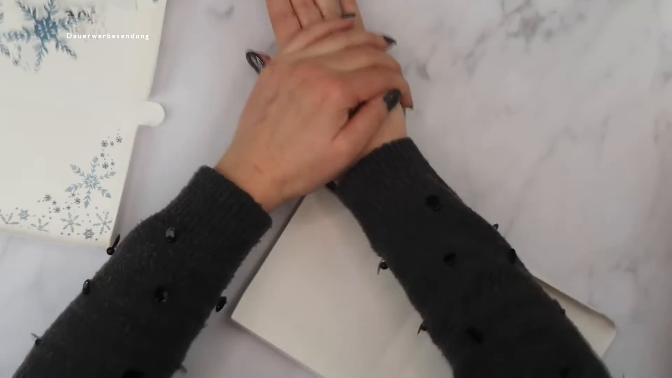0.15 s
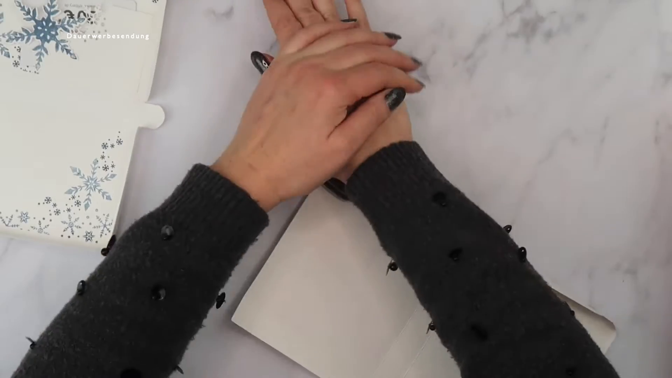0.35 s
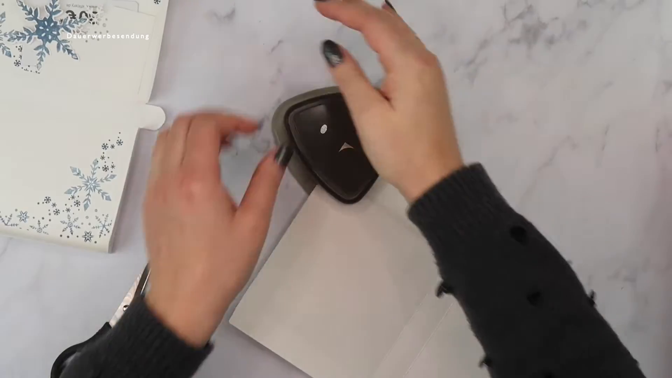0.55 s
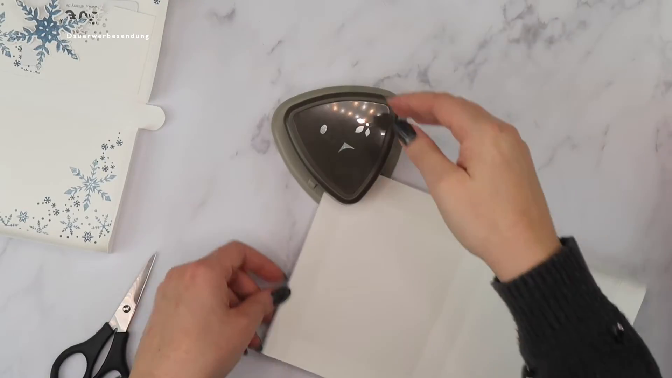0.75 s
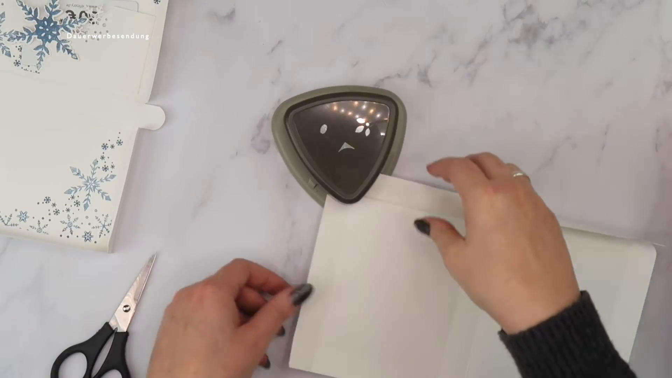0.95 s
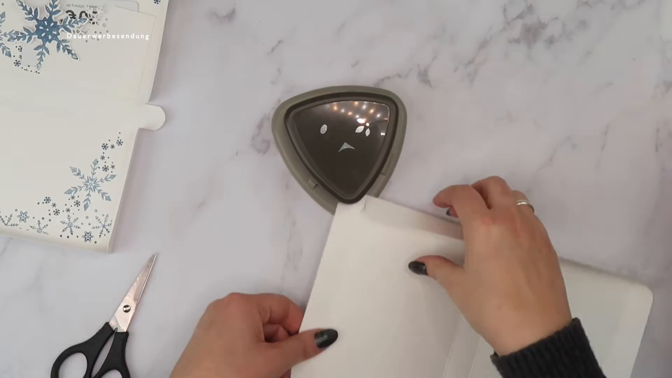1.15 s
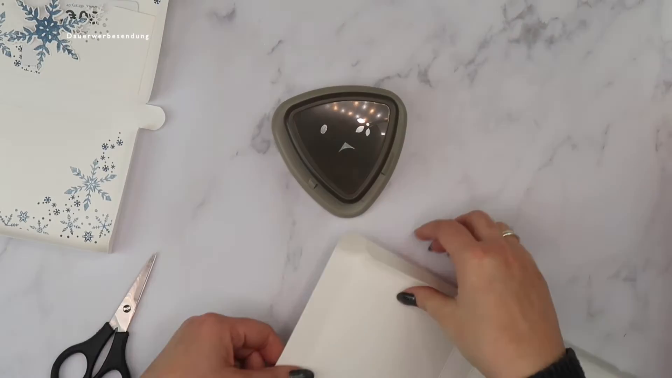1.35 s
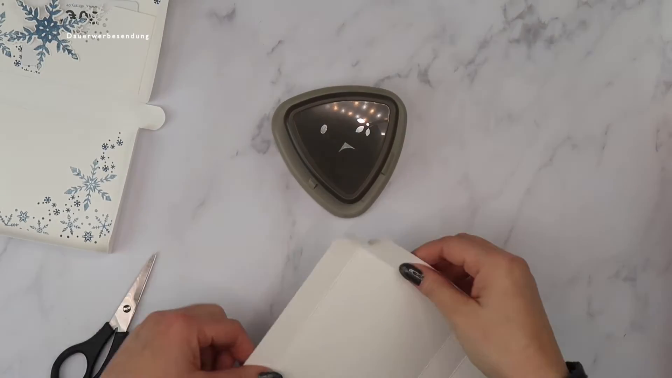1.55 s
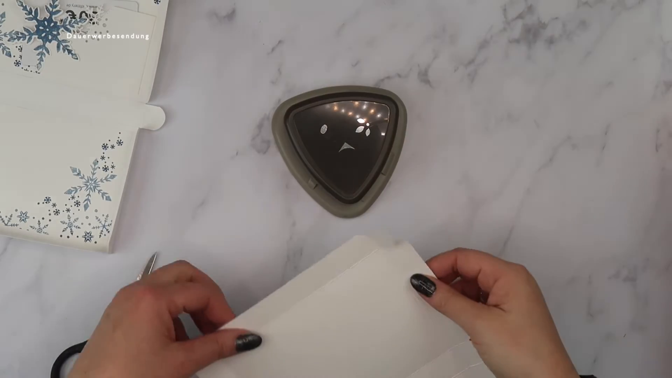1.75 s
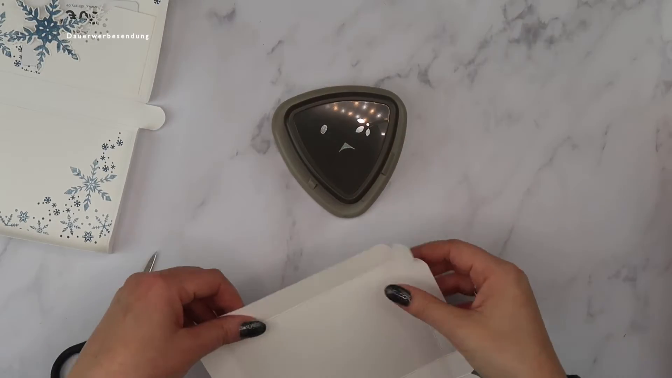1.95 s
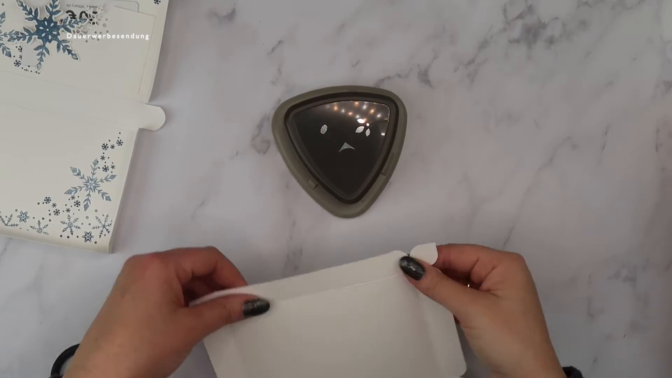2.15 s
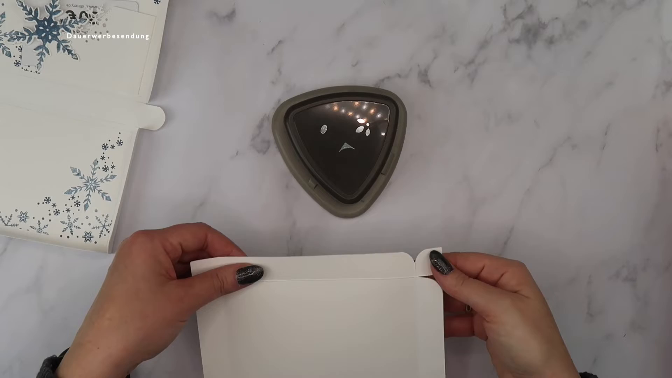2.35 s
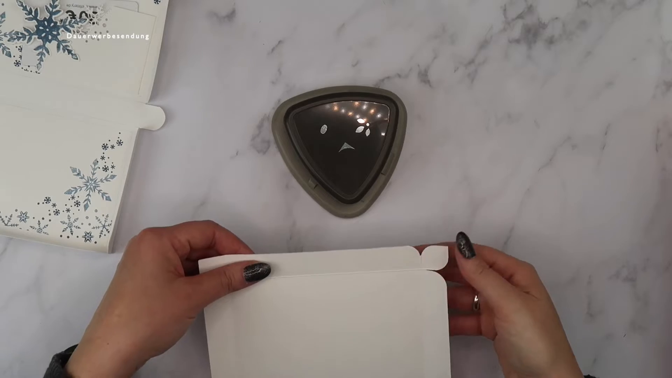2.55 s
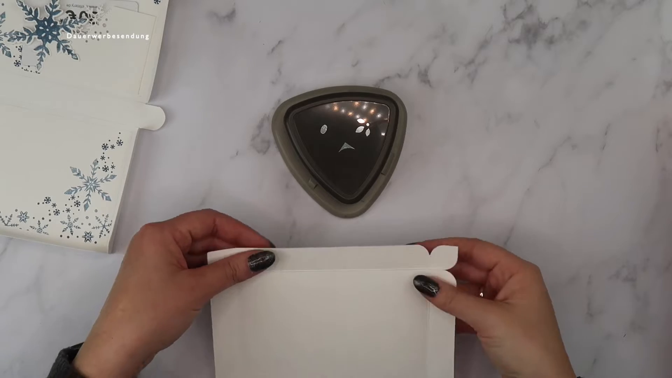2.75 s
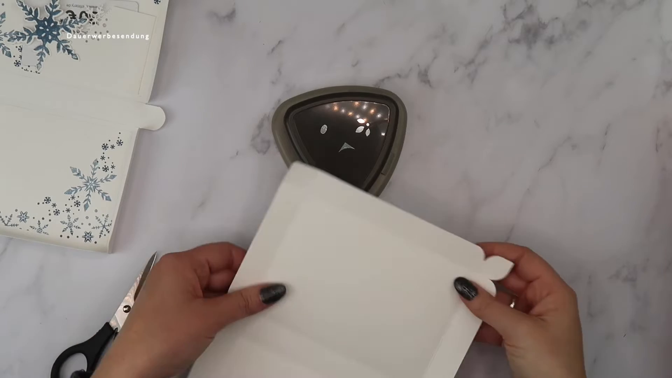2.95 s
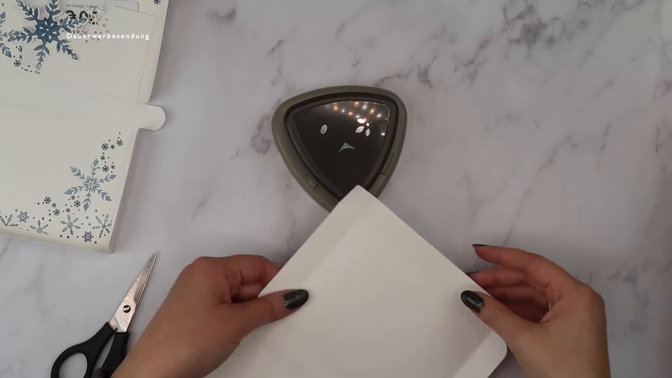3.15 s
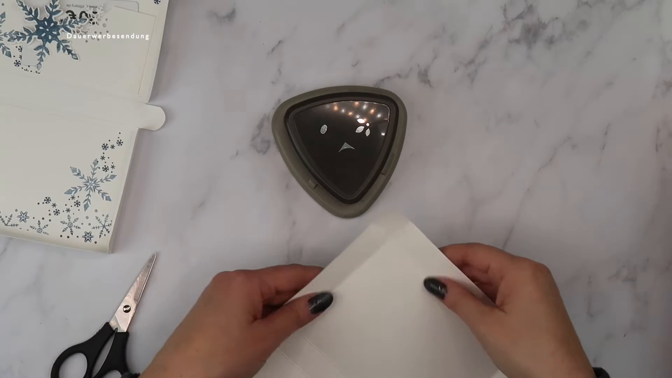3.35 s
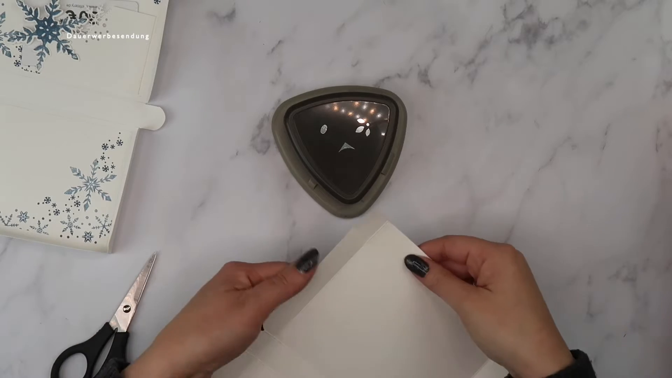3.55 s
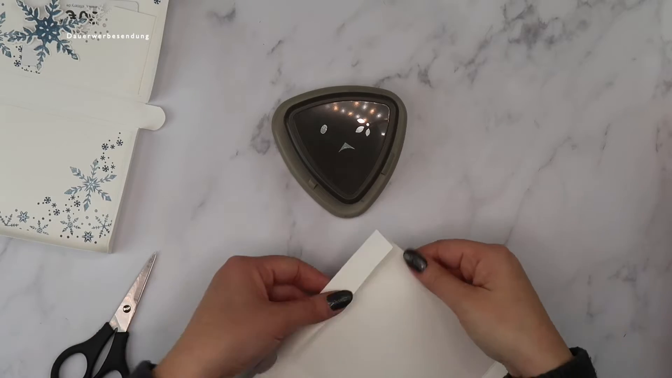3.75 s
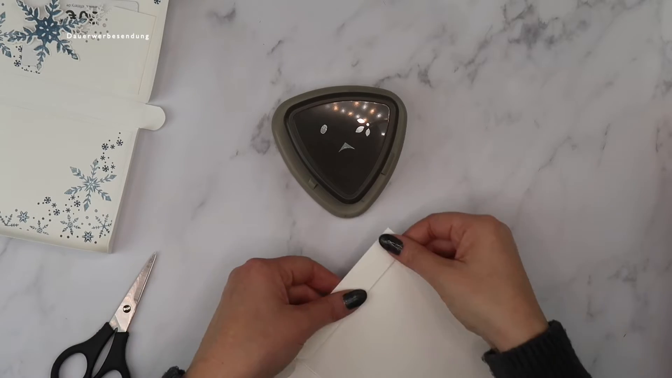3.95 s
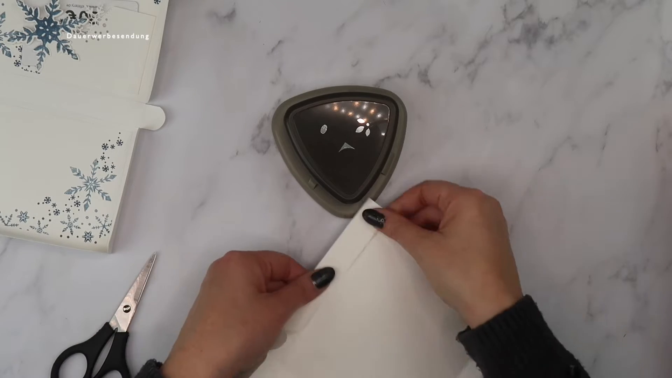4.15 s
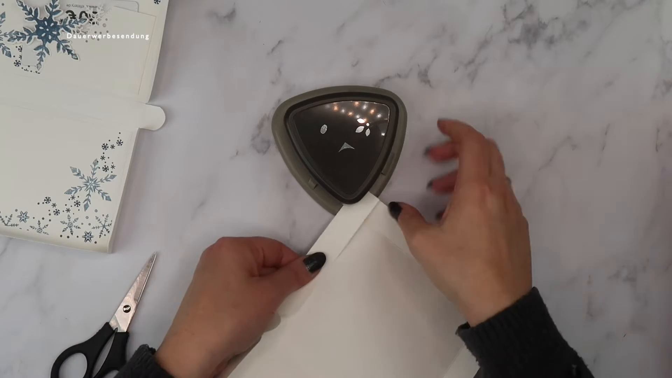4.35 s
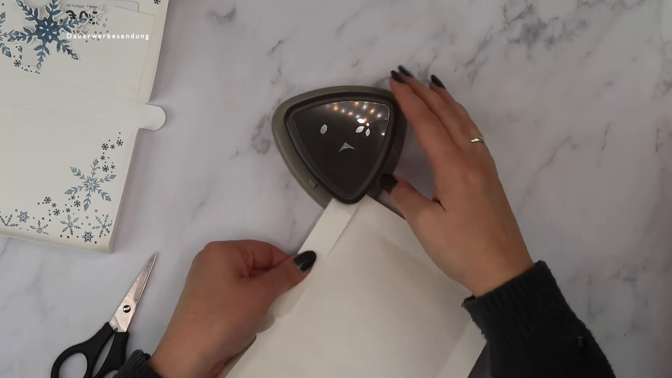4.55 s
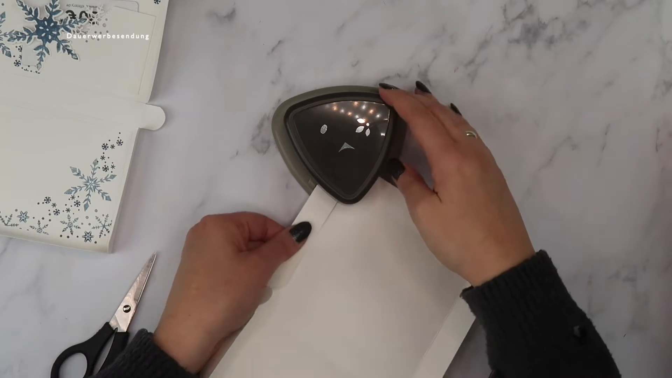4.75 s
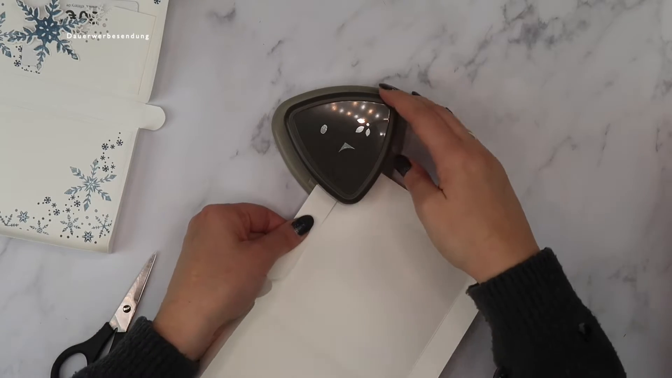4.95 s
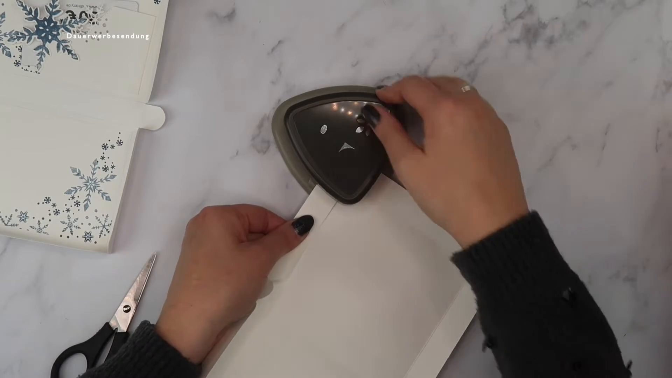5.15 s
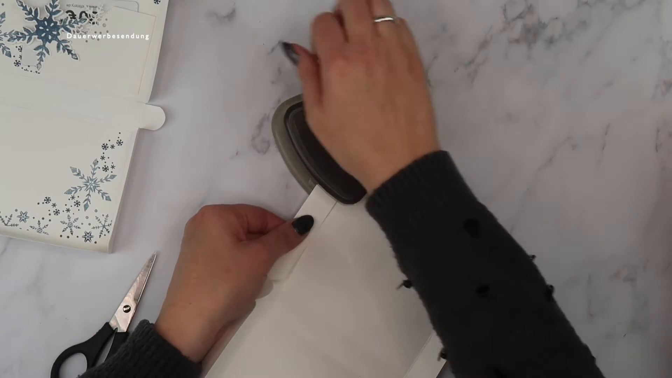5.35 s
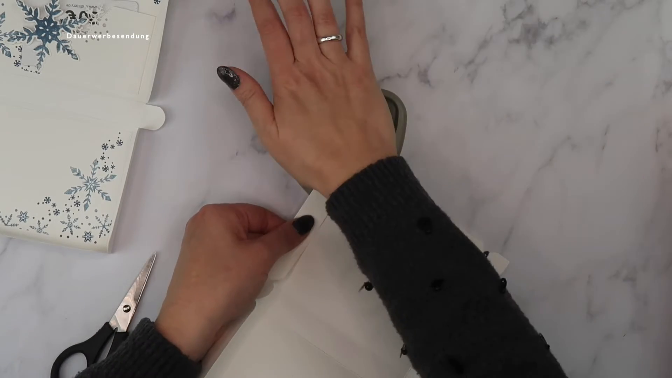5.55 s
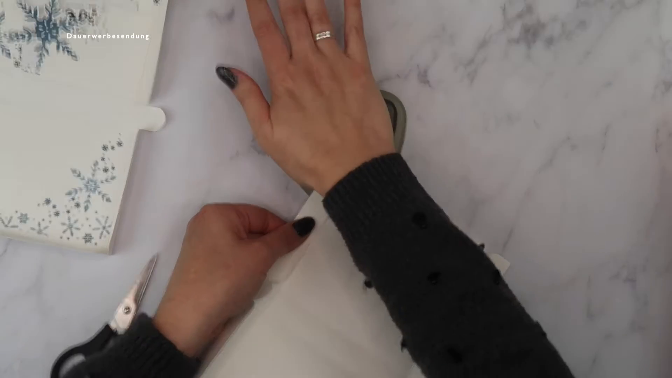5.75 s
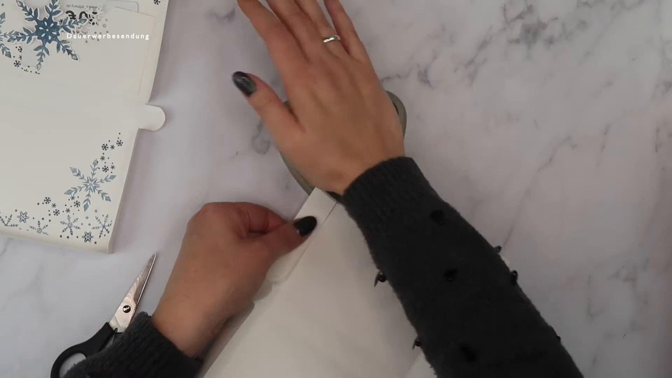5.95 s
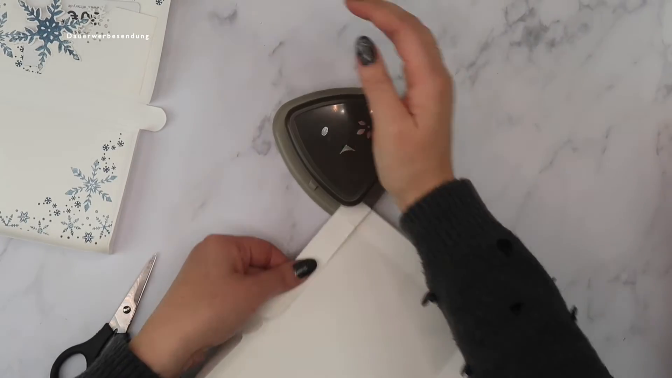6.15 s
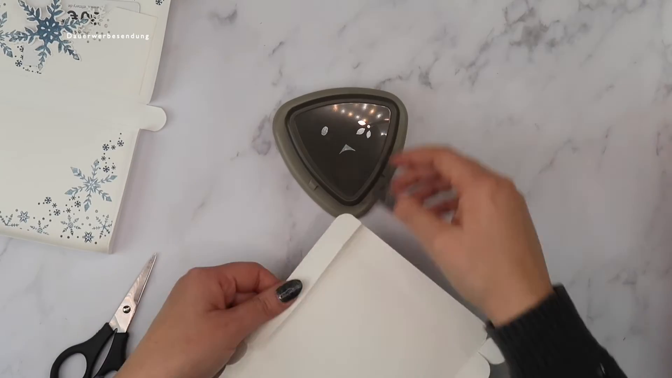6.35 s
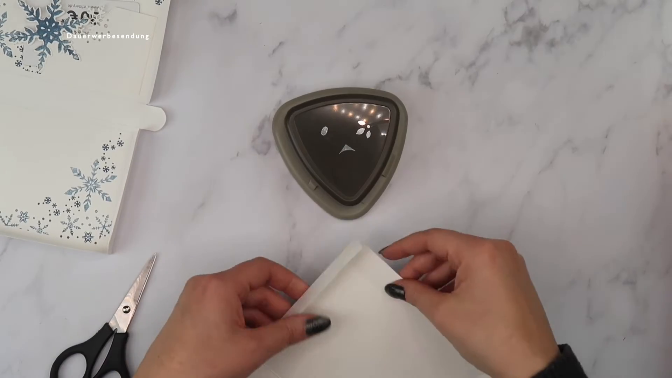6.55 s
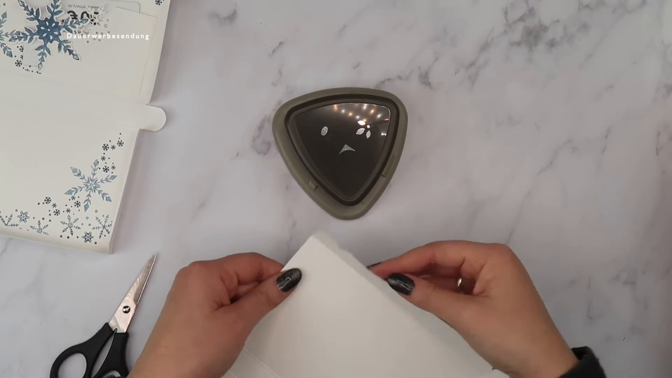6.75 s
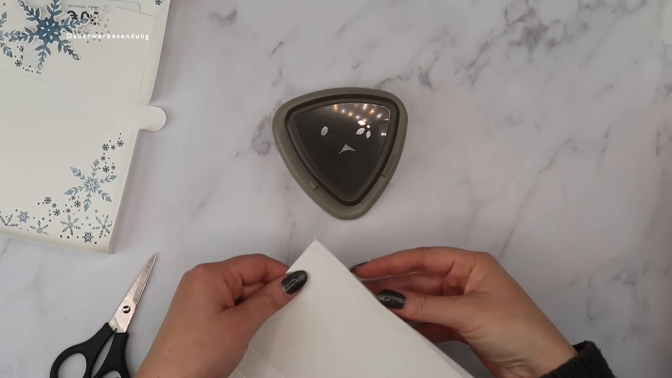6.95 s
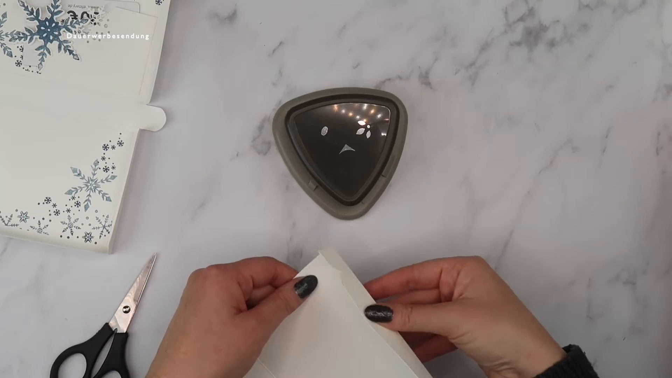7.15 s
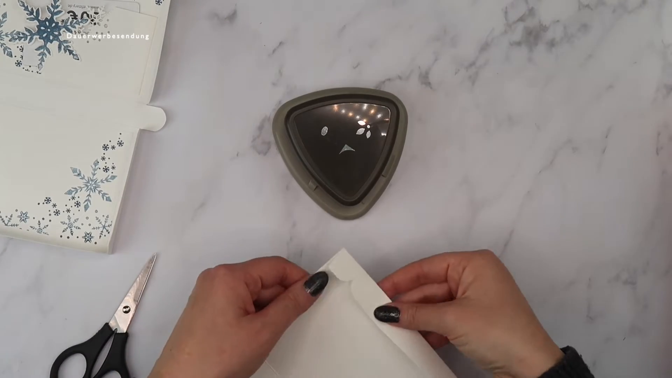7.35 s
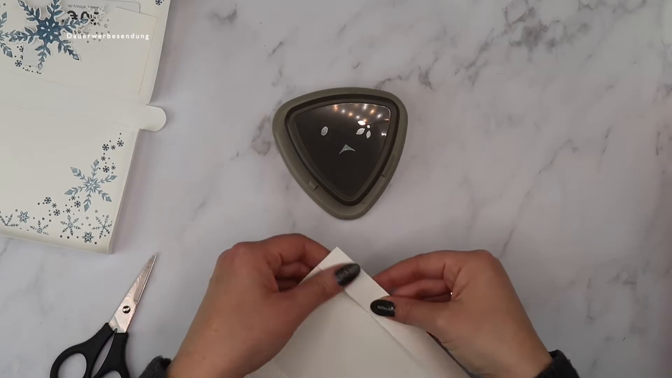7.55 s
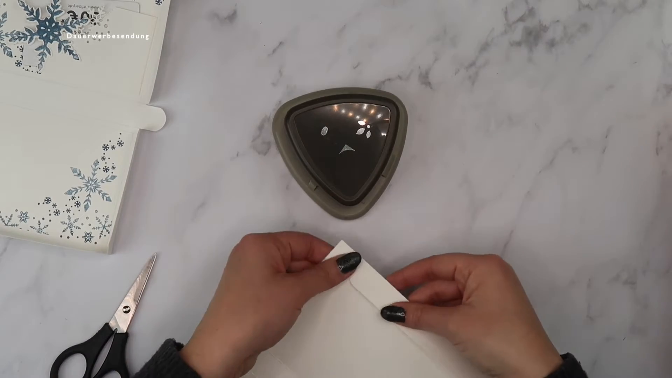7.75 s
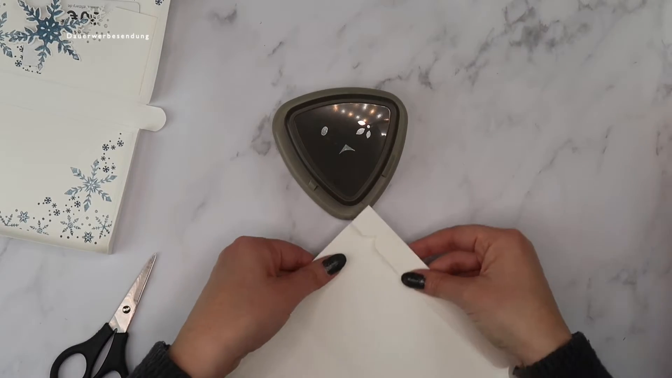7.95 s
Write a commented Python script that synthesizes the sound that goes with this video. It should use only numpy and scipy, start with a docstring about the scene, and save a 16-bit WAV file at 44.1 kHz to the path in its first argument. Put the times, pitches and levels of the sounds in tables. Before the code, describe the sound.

Two sharp, thumping punch clacks with scuffing spring-back, separated and followed by dry card rustles, taps, small squeaks and slides in a quiet room.

```python
"""A plastic corner punch on a craft table is leaned on twice: blade impacts crack, excite the shell's
modes and thump the table's modes, and a sprung lid scuffs in its guide on the way down and back.
Between and after the punches, a card is pulled out, flicked, turned and slid: filtered bursts, rings
and grains of friction. A small room adds noise, a faint hum and a decaying response; the level drops
after each punch and creeps back under automatic gain."""
import sys
import numpy as np
from scipy import signal
from scipy.fft import rfft, irfft, next_fast_len
from scipy.io import wavfile
from scipy.ndimage import uniform_filter1d, minimum_filter1d, map_coordinates

SR = 44100
rng = np.random.default_rng(int(sys.argv[2]) if len(sys.argv) > 2 else 0)


def to_wav(sig):
    """Store sig (one row per channel, or 1-D mono) as 16-bit WAV at the path in sys.argv[1].

    Samples outside -1..1 are clipped; the rate is SR.
    """
    pcm = np.clip(np.atleast_2d(sig), -1, 1) * 32767
    pcm = np.round(pcm).astype(np.int16)
    wavfile.write(sys.argv[1], SR, pcm.T)  # frames by channels


N = 356328

# modes of the table top: f/Hz, relative level/dB, t60/s before the leaning hands damp it
TABLE_MODES = [(65.3, -7, 0.33), (111.2, -10, 0.16), (130, -8, 0.11), (249.5, -1, 0.074),
               (332.3, -5.5, 0.15), (373, -29.5, 0.07), (476, -11, 0.13), (624, -30, 0.049)]


def amp(db):
    """Level to amplitude: 20 dB is a factor of ten."""
    return 10 ** (np.asarray(db) / 20)


def unit(x):
    """Normalise the mean power, giving rms 1."""
    return x / np.sqrt(np.mean(x ** 2) + 1e-20)


def along(points, hz):
    """Interpolate (f, value) points linearly over logarithmic frequency."""
    f, value = np.transpose(points)
    return np.interp(np.log(hz + 1), np.log(f + 1), value)


def wobble(rate):
    """Band-limited random modulation: a smooth curve through random knots, rate of them a second."""
    knots = rng.standard_normal(int(N * rate / SR) + 4)
    return map_coordinates(knots, [np.arange(N) * rate / SR])


def colour(x, gain):
    """Minimum-phase filtering: folding the cepstrum of a gain curve makes its filter causal."""
    n = x.shape[-1]
    m = 2 * next_fast_len(n // 2 + 2048)
    log_gain = np.log(np.maximum(gain(np.fft.rfftfreq(m, 1 / SR)), 1e-6))
    cepstrum = irfft(log_gain)
    cepstrum[1:m // 2] *= 2
    cepstrum[m // 2 + 1:] = 0
    response = np.exp(rfft(cepstrum))
    return irfft(rfft(x, m) * response, m)[..., :n]


def filtered(x, response):
    """Linear filtering: the spectrum times a complex response of frequency."""
    m = next_fast_len(N + SR // 2)
    return irfft(rfft(x, m) * response(np.fft.rfftfreq(m, 1 / SR)), m)[..., :N]


def shaped(x, spectrum):
    """Spectral shaping: x through a curve of f/Hz, level/dB, at rms 1."""
    return unit(colour(x, lambda hz: amp(along(spectrum, hz))))


def resonance(hz, centre_hz, q):
    """Gain of a damped oscillator near its resonance, about 1 at the centre."""
    return 1 / np.hypot(1, q * (hz / centre_hz - centre_hz / (hz + 1)))


def fade(t, t60):
    """Exponential decay, 60 dB in t60 seconds."""
    return np.exp(-np.log(1000) * t / t60)


def ring(modes, t):
    """Modal superposition: decaying sines, each level scattered by about 1 dB at every blow."""
    return sum(amp(db + rng.standard_normal()) * fade(t, t60) * np.sin(2 * np.pi * hz * t)
               for hz, db, t60 in modes)


def burst(t, t60, push, gain):
    """Contact excitation: dying noise led by an impulse (push, relative to the noise), then coloured."""
    noise = rng.standard_normal(len(t)) * fade(t, t60)
    noise[0] += push * np.linalg.norm(noise)
    decay_rms = np.sqrt(np.mean(fade(t, t60) ** 2))
    return unit(colour(noise, gain)) * decay_rms


def add(track, s, sound):
    """Linear superposition: mix a sound into the track at s seconds."""
    part = track[max(round(s * SR), 0):][:len(sound)]
    part += sound[:len(part)]


def swell(start, rise, fall):
    """Movement envelope: a speed ramps up, then down, and a sine of its power sets the gain."""
    speed = np.interp(np.arange(N) / SR, [start, start + rise, start + rise + fall], [0, 1, 0])
    return np.sin(np.pi / 2 * speed ** 0.97)


def background():
    """Stationary noise: partly decorrelated room air in two channels, plus slightly unsteady mains hum."""
    # room air: f/Hz, relative level/dB
    air_spectrum = [(12, -34.5), (20, -1.5), (52, 3.5), (70, -9.5), (92, -5), (175, -10.5), (252, -8),
                    (534, -12.5), (857, -17.5), (958, -17.5), (1040, -18), (1870, -20), (2540, -22.5),
                    (11100, -38.5), (15500, -56)]
    # stereo width of the air: f/Hz, side level re mid/dB
    air_width = [(60, -28), (110, -12.5), (200, -1.5), (380, -0.5), (700, 0), (1290, 0), (2380, -1),
                 (4400, 3.5), (8120, -1), (15000, 8)]
    # mains hum partials: f/Hz, relative level/dB
    hum_partials = [(48.4, -61.5), (102.3, -61.5), (150.7, -64.5), (204.6, -66), (247.6, -77.5)]
    t = np.arange(N) / SR
    air = shaped(rng.standard_normal(N), air_spectrum)
    other_air = shaped(rng.standard_normal(N), air_spectrum)
    side = colour(other_air, lambda hz: amp(along(air_width, hz)))
    hum = sum(amp(db + 0.86 * wobble(13)) * np.sin(2 * np.pi * hz * t + .5 * wobble(0.67))
              for hz, db in hum_partials)
    return amp(-54.0) * np.array([air + side, air - side]) + amp(1.0) * hum


def leaning():
    """Forced vibration: shifting weight stirs the table's modes, radiating less well at low frequency."""
    # weight shifts: start t/s, loading time/s, easing time/s, level/dB
    shifts = [(0, 0.016, 0.064, -38), (.25, 0.054, 0.14, -43.5), (.38, 0.023, 0.153, -36.5),
              (4.63, 0.063, 0.08, -52.5), (5.53, 0.057, 0.069, -48.5), (5.61, 0.039, 0.11, -42),
              (5.86, 0.067, 0.16, -41), (5.99, 0.022, 0.22, -36)]
    top = lambda hz: sum(amp(db) * resonance(hz, centre, q=14) * np.sqrt(t60) / centre
                         for centre, db, t60 in TABLE_MODES)
    radiated = lambda hz: top(hz) * resonance(hz, 100, q=0.72)
    load = sum(amp(db) * swell(start, rise, fall) for start, rise, fall, db in shifts)
    return load * unit(colour(rng.standard_normal(N), radiated))


def held():
    """Gating: a smoothed switch, 1 while the fingers hold the card and 0 otherwise."""
    # spells of holding: from t/s, to t/s
    spells = (1.0, 5.5), (6.25, 9.9)
    t = np.arange(N) / SR
    return uniform_filter1d(sum(1.0 * ((t > start) & (t < end)) for start, end in spells), size=2000)


def friction(rate, spread_db, smooth):
    """Stick-slip: paper fibres catch and let go, as impulses of uneven size over a smooth rush."""
    struck = rng.random(N) < rate / SR
    size = amp(spread_db * np.minimum(rng.exponential(size=N), 4))
    catches = struck * rng.choice([-1, 1], N) * size
    return unit(catches) + smooth * rng.standard_normal(N)


def sliding():
    """Sliding friction: speed governs a low rustle of catches and a high hiss against the skin."""
    # single pushes or turns: start t/s, speeding up/s, slowing down/s, relative rustle and hiss level/dB
    strokes = [(.49, 0.025, 0.033, -46, -52.5), (.715, 0.0247, 0.11, -47.5, -51),
               (1.05, 0.035, 0.44, -47, -56), (1.421, 0.055, 0.26, -53.5, -61.5),
               (1.9, 0.16, 0.094, -51.5, -60.5), (2.17, 0.022, .28, -56.5, -62),
               (2.75, 0.13, 0.15, -60.5, -61.5), (3.289, 0.1, 0.11, -44.5, -58),
               (3.44, 0.056, 0.14, -55.5, -62), (3.58, 0.035, 0.072, -46.5, -57.5),
               (3.7, 0.072, 0.066, -45.5, -59.5), (3.83, 0.022, 0.21, -53.5, -61),
               (3.99, 0.083, 0.11, -49.5, -56), (4.16, 0.06, 0.18, -51.5, -60.5),
               (4.35, 0.13, 0.16, -53.5, -66), (4.52, 0.2, 0.08, -45, -53), (4.76, 0.068, 0.046, -48, -56),
               (5.57, 0.075, 0.072, -47, -62.5), (6.04, 0.026, 0.19, -43, -53),
               (6.259, 0.039, 0.062, -50.5, -68), (6.399, 0.14, 0.043, -47.5, -57),
               (6.56, 0.04, 0.21, -53, -65), (6.94, 0.078, 0.13, -50.5, -64),
               (7.13, 0.043, 0.087, -41.5, -57), (7.38, 0.02, 0.25, -50.5, -62),
               (7.57, 0.019, 0.37, -51, -63), (7.74, 0.13, 0.19, -47, -57)]
    # rustle: f/Hz, relative level/dB
    scrape_spectrum = [(200, -21), (450, -3), (1100, 5), (1600, 4), (2000, 5), (2450, 3), (2900, 2),
                       (3600, -14), (6000, -16.5), (12000, -47)]
    # skin on paper: f/Hz, relative level/dB
    hiss_spectrum = [(1500, -16), (3500, 4.5), (5500, 3), (8000, -3), (13000, -9), (15500, -20)]
    grip = amp(1.5 * wobble(45))
    scrape = shaped(grip * friction(rate=150, spread_db=2, smooth=0.76), scrape_spectrum)
    hiss = shaped(grip * friction(rate=2900, spread_db=-1.5, smooth=0.64), hiss_spectrum)
    # a faint rustle and hiss remain between strokes; independent movements add in power
    power = (amp([[-69], [-70.5]]) * held()) ** 2
    for start, rise, fall, rustle_db, hiss_db in strokes:
        power += (amp([[rustle_db], [hiss_db]]) * swell(start, rise, fall)) ** 2
    rustle_gain, hiss_gain = np.sqrt(power)
    return amp(-5) * rustle_gain * scrape + amp(-1.5) * hiss_gain * hiss


def judder(length, db, centre_hz, q):
    """Stick-slip exciting a resonance of the card; the narrower it is, the more it stutters."""
    n = round(length * SR)
    catches = friction(rate=670, spread_db=2.0, smooth=0.57)[:n] * signal.windows.tukey(n, .5)
    unevenness = map_coordinates(rng.standard_normal(n // 700 + 4), [np.arange(n) / 700])
    stuttering = np.pad(catches * amp(.35 * q * unevenness), (0, n // 4))
    # a weak broad skirt surrounds the peak
    gain = lambda hz: resonance(hz, centre_hz, q) ** 2 + amp(-32.0) * resonance(hz, centre_hz, 1)
    return amp(db - 4.5) * unit(colour(stuttering, gain))


def rubs():
    """Friction-driven resonance: an edge rasps on one broad mode, a fingertip squeaks on two narrow ones."""
    # an edge along the table or the slot: start t/s, length/s, relative level/dB, centre f/Hz
    rasps = [(0.074, .047, -30, 692), (1.217, 0.196, -49.5, 1700), (2.091, 0.16, -56, 1450),
             (2.372, 0.056, -50.5, 1220), (3.105, 0.031, -55.5, 2220), (3.156, 0.088, -54.5, 1450),
             (3.335, 0.1, -50.5, 1410), (3.772, .058, -52, 1750), (4.38, 0.12, -43.5, 1480),
             (4.575, 0.13, -52, 1960), (4.704, 0.18, -42.5, 2080), (4.705, 0.166, -54, 3960),
             (6.524, 0.025, -39.5, 1840), (6.957, 0.056, -45.5, 1420), (7.157, 0.072, -57, 2000),
             (1.34, .075, -46, 1390), (7.246, 0.029, -46, 270), (7.765, 0.082, -49.5, 2620)]
    # fingertip squeaks: start t/s, length/s, relative level/dB of the lower and the upper resonance
    squeaks = [(.004, 0.023, -37.5, -77.5), (1.08, 0.42, -60, -70), (3.77, 0.12, -61, -57),
               (3.91, 0.02, -44, -53), (4.025, 0.023, -41.5, -53), (4.061, 0.015, -42.5, -52),
               (5.617, 0.028, -41, -64), (5.653, 0.011, -37.5, -62), (6.251, 0.12, -52.5, -56.5),
               (6.399, 0.029, -46, -55), (6.454, 0.098, -47, -46.5), (7.798, 0.02, -50, -50.5)]
    out = np.zeros(N)
    for start, length, db, centre_hz in rasps:
        add(out, start, judder(length, db, centre_hz, q=3.2))
    for start, length, *mode_dbs in squeaks:
        for db, centre_hz in zip(mode_dbs, (848, 2870)):
            add(out, start, judder(length, db, centre_hz, q=6.5))
    return out


def flick(db, centre_hz, knock_db, t60):
    """Impulsive excitation: the card rings at a pitch set by how it is held, over a hollow knock."""
    # colour of the held card: f/Hz, relative level/dB
    card_colour = [(100, -4.5), (600, -1), (780, 4.5), (1000, 3.5), (1300, 4), (1650, 4.5), (2000, 6),
                   (2300, 1.5), (2700, 3.5), (3500, 1.5), (15000, -7.5)]
    # broad sound around the resonance: f/Hz, relative level/dB
    skirt = [(100, -2.5), (500, -3.5), (3000, -24), (5000, -30), (8000, -46), (15000, -61)]
    t = np.arange(SR // 4) / SR
    sheet = lambda hz: amp(along(card_colour, hz)) * (
        resonance(hz, centre_hz, q=1.44) ** 2 + amp(along(skirt, hz)))
    snap = burst(t, t60, push=.24, gain=sheet)
    knock = burst(t, t60=0.11, push=0.12, gain=lambda hz: resonance(hz, 492, q=1.83) ** 2)
    return amp(db - 8.0) * (snap + amp(knock_db - 7) * knock)


def ticks():
    """Random point process: faint creaks of the card at random moments, heard only while it is held."""
    ticks_per_s, tick_db, spread_db, tick_hz = 4, -47.5, 3.5, 1660
    out = np.zeros(N)
    for when, size, pitch in rng.random((round(ticks_per_s * N / SR), 3)):
        db = tick_db + spread_db * (2 * size - 1)
        centre_hz = tick_hz * 2 ** (pitch - .5)  # spread over one octave
        add(out, when * N / SR, flick(db, centre_hz, knock_db=-18, t60=0.071))
    return held() * out


def nails():
    """Brief impacts on a high resonance: a nail snaps on the card's edge as a bright tick."""
    # nail snaps: t/s, relative level/dB
    nail_hits = [(2.096, -49.5), (3.02, -48.5), (3.73, -49), (4.058, -50), (4.251, -49.5), (7.404, -48),
                 (7.415, -48.5), (7.596, -45)]
    out, t = np.zeros(N), np.arange(SR // 8) / SR
    for s, db in nail_hits:
        tick = burst(t, t60=0.03, push=0.18, gain=lambda hz: resonance(hz, 4300, q=1.2) ** 2)
        add(out, s, amp(db) * tick)
    return out


def flicks():
    """Impact and flexure: fingers tap and flex the held card, exciting its resonance each time."""
    # taps: t/s, relative level/dB, centre f/Hz, relative knock level/dB
    taps = [(1.599, -37, 1560, -10), (1.726, -37, 820, -39.5), (2.118, -31.5, 765, -4),
            (2.145, -35.5, 528, -8), (2.406, -38, 1100, -17), (3.02, -29.5, 1240, -2),
            (3.411, -28.5, 1460, -8), (3.43, -29.5, 2000, -5), (3.605, -33.5, 1100, -23),
            (3.729, -32, 1300, -21), (3.777, -37, 1700, -4), (3.843, -32, 706, -16),
            (3.848, -29.5, 1620, -0.5), (3.909, -38.5, 754, 6), (3.942, -30, 1960, -14),
            (4.244, -29.5, 1540, -27), (4.251, -32, 1530, -17), (4.365, -23.5, 625, 0.5),
            (4.416, -45, 1480, -28), (4.709, -29.5, 1870, -25), (4.856, -25, 790, -4.5),
            (4.985, -44, 1800, -18), (5.111, -43, 2000, -20), (6.45, -34.5, 821, -16),
            (6.483, -34.5, 2910, -21), (6.532, -38, 940, 9.5), (6.615, -32, 736, -1),
            (6.966, -34.5, 510, 6.5), (6.995, -38, 1400, -10), (7.254, -29, 555, 7),
            (7.29, -30.5, 1080, -20), (7.405, -30, 910, 0), (7.415, -34.5, 1000, -4),
            (7.459, -37.5, 2700, -8), (7.596, -32, 1620, -8), (7.61, -38, 1900, -17),
            (7.655, -31.5, 736, -9), (7.8845, -22, 1440, -39)]
    out = np.zeros(N)
    for s, db, centre_hz, knock_db in taps:
        add(out, s, flick(db, centre_hz, knock_db, t60=0.065))
    return out


def snags():
    """Free-edge vibration: the edge springs free of the slot, ringing lower as more card comes out."""
    # catches as the card is drawn out: t/s, relative level/dB
    catches = [(0.726, -28.5), (.837, -16), (.852, -17.5), (.911, -36.5), (0.9874, -17), (1.07, -28.5),
               (1.078, -19.5), (1.091, -26.5), (1.157, -22.5), (1.215, -23.5), (1.267, -26), (1.309, -29.5),
               (1.341, -26.5), (1.387, -33.5)]
    # modes of the freed edge: multiple of its pitch, relative level/dB, t60/s
    edge_modes = [(.56, -4.5, 0.09), (0.928, -5, 0.09), (1.06, -13, 0.08)]
    start_hz, sag_hz_per_s = 2117, 652
    out, t = np.zeros(N), np.arange(SR // 4) / SR
    for s, db in catches:
        pitch_hz = start_hz - sag_hz_per_s * (s - catches[0][0])
        modes = [(pitch_hz * ratio * (1 + 0.0306 * rng.standard_normal()), level, t60)
                 for ratio, level, t60 in edge_modes]
        onset = 1 - fade(t, 0.018)
        edge = amp(db - 11) * ring(modes, t) * onset
        add(out, s, edge + flick(db - 1.5, pitch_hz, knock_db=-22, t60=0.089))
    return out


def thump(t, hardness_db):
    """Modal impact: a harder blow (dB per octave) favours upper modes; the lowest bass barely radiates."""
    modes = [(hz, db + hardness_db * np.log2(hz / 180), t60) for hz, db, t60 in TABLE_MODES]
    sway = ring(modes, t) * fade(t, t60=.8)  # the leaning hands add damping
    low_cut = signal.butter(2, 52, "highpass", fs=SR, output="sos")
    return -signal.sosfilt(low_cut, sway)  # the table dips first


def lid():
    """Stick-slip in a guide: the sprung lid creaks under the palm and springs back in hollow scuffs."""
    # lid slips: t/s, relative level/dB, table thump re slip/dB
    slips = [(.007, -41, 6), (0.285, -32, -2), (0.337, -38.5, 4.5), (0.425, -16, -15.5), (0.457, -15, -27),
             (0.467, -32.5, -8), (5.558, -33, -13), (5.598, -31, -10), (5.659, -33.5, -4.5),
             (5.673, -24.5, -11.5), (5.94, -35, 3), (5.991, -30.5, -8), (6.014, -19, -10),
             (6.040, -10, -11), (6.083, -18, -24)]
    # colour of the guide: f/Hz, relative level/dB
    guide_colour = [(100, -22.5), (350, -3), (650, 2.5), (860, 8.5), (1150, 2), (2100, -3), (2900, -10.5),
                    (4500, -20.5), (7000, -34.5), (15000, -55)]
    out, t = np.zeros(N), np.arange(SR // 3) / SR
    for s, db, thump_db in slips:
        scuff = amp(-8.5) * burst(t, t60=0.094, push=0.15, gain=lambda hz: amp(along(guide_colour, hz)))
        add(out, s, amp(db) * (scuff + amp(thump_db) * thump(t, hardness_db=-0.5)))
    return out


def punch():
    """Impact and modal ringing: the blade cracks, rings the shell and thumps the table; light blows are duller."""
    # the blade breaks through, bottoms out and rattles:
    # t/s, relative clack level/dB, relative table thump level/dB, hardness/(dB per octave)
    blows = [(0.0996, -2.5, 1.5, -0.5), (0.1069, -1, 3.5, -2.5), (0.1129, 3.5, -8.5, -6),
             (0.1153, -1.5, -5.5, -4.5), (0.164, -19, -32.5, -0.5), (.186, -19.5, -26.5, -9),
             (0.211, -28, -39, -5), (0.217, -35, -31, -3.5), (5.756, -8, -5.5, 3.5),
             (5.762, -1, -7.5, -0.5), (5.7668, -7, 3.5, 1), (5.78, 1, -4, 1), (5.787, -20, -0.5, -2),
             (5.875, -42, -53, -4), (5.907, -40, -61, -10)]
    # modes of the shell: f/Hz, relative level/dB, t60/s
    shell_modes = [(771, -18, 0.13), (837, -15, 0.083), (1117, -20, .1), (1314, -15, .11),
                   (1450, -18.5, .12), (1544, -14.5, .1), (1850, -20.5, 0.075), (1980, -13.5, .06),
                   (2080, -17, .05), (2168, -15, .06), (2290, -23.5, .05), (2840, -28, .1),
                   (4020, -26, 0.076), (4600, -27.5, 0.091)]
    # the crack: f/Hz, relative level/dB
    crack_spectrum = [(100, 14), (400, 4.5), (1000, 1), (1500, 7), (2150, 4.5), (2900, -11.5), (4600, -15),
                      (7000, -21.5), (11000, -25.5), (15500, -37.5)]
    out, t = np.zeros(N), np.arange(SR // 2) / SR
    for s, clack_db, thump_db, hardness_db in blows:
        edge_hz = 16000 * amp(0.25 * clack_db)  # treble limit rises with force
        tone = lambda hz: amp(along(crack_spectrum, hz)) / np.hypot(1, (hz / edge_hz) ** 2)
        crack = amp(-8.0) * burst(t, t60=.03, push=.45, gain=tone)
        clack = crack + amp(-18.5) * ring(shell_modes, t)
        add(out, s, amp(clack_db) * clack + amp(thump_db - 9) * thump(t, hardness_db))
    return amp(11.0) * out


def nearby(x):
    """Interference: surfaces around the work favour and cancel the same pitches in tool and card alike."""
    # peaks and dips: centre f/Hz, 1/e half-width/Hz, level/dB
    peaks = [(425, 29, -3.5), (515, 32, 1), (667, 43, -3.5), (784, 54, 2.5), (970, 40, -3.5),
             (1183, 31, -2), (1284, 37, 3), (1470, 55, -4.5), (1563, 34, 5), (1816, 66, 1.5), (2160, 66, 1),
             (2460, 70, -1.5)]
    return colour(x, lambda hz: amp(sum(db * np.exp(-((hz - centre) / width) ** 2)
                                        for centre, width, db in peaks)))


def tail():
    """Reverberant decay: noise of energy 1, each frequency dying at its own speed, after a short delay."""
    # reverberation: f/Hz, t60/s
    reverberation = [(100, 0.11), (500, 0.18), (2000, 0.17), (6000, 0.18), (14000, 0.15)]
    hz, t, z = signal.stft(rng.standard_normal(SR // 2), SR, nperseg=256)
    decaying = z * fade(t, along(reverberation, hz)[:, None])
    response = signal.istft(decaying, SR, nperseg=256)[1]
    return np.pad(response / np.linalg.norm(response), (round(0.0055 * SR), 0))


def in_room(x, wet_db):
    """Reverberation and decorrelation: phase and scatter set the channels apart, most in the treble."""
    # stereo width: f/Hz, relative side level/dB
    stereo_width = [(60, -43), (125, -31), (500, -22), (1000, -19), (2000, -14), (4000, -3), (8000, 1.5),
                    (15000, 1.5)]
    mid, other = (x + amp(wet_db) * signal.fftconvolve(x, tail())[:N] for _ in range(2))
    scatter = irfft(np.exp(2j * np.pi * rng.random(129)))  # flat spectrum, random phase
    scattered = signal.fftconvolve(other, scatter)[:N]
    # 1j turns the side signal by a quarter cycle
    side = filtered(.65 * other + .6 * scattered, lambda hz: 1j * amp(along(stereo_width, hz)))
    return np.array([mid + side, mid - side])


def scene():
    """Linear superposition of punch, card and background, with the room's response."""
    card = snags() + flicks() + nails() + ticks() + sliding() + rubs()
    tool = punch() + lid() + leaning()
    return in_room(nearby(tool), wet_db=-11.5) + in_room(nearby(card), wet_db=-10) + background()


def gain_control(x, limit_db, release_db):
    """Automatic gain: drops quickly on a loud sound and climbs back by release_db a second."""
    power = np.abs(uniform_filter1d(np.mean(x ** 2, axis=0), size=1800))
    excess = np.maximum(10 * np.log10(power + 1e-12) - limit_db, 0)
    climb = release_db * np.arange(N) / SR
    cut = np.maximum.accumulate(excess + climb) - climb
    return x * amp(uniform_filter1d(minimum_filter1d(-cut, size=600), size=300))


def record(dry):
    """Dynamic compression, rounded saturation at full scale and a band limit."""
    x = gain_control(dry, limit_db=-11.5, release_db=10.0)
    x = x / (1 + x ** 6) ** (1 / 6)
    return filtered(x, lambda hz: hz < 15700)


dry = scene()
out = record(dry)
to_wav(out)
```